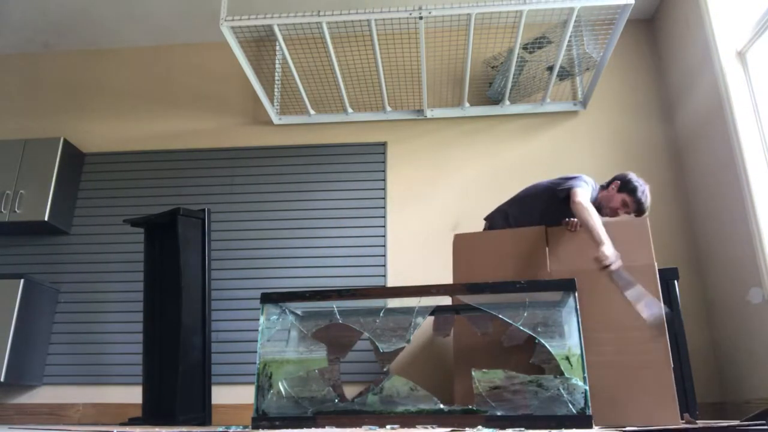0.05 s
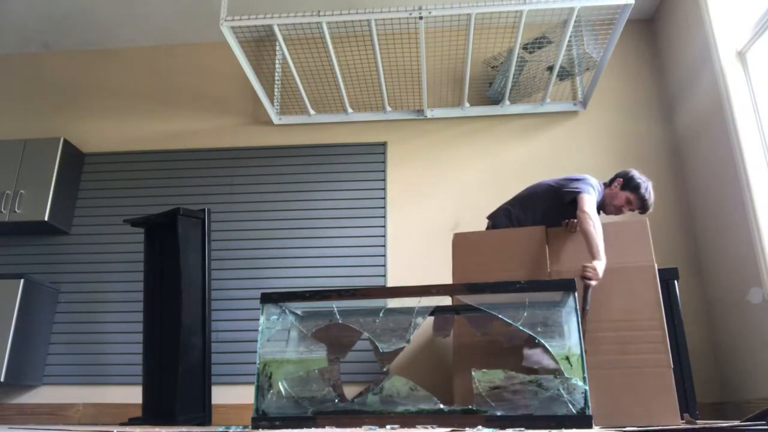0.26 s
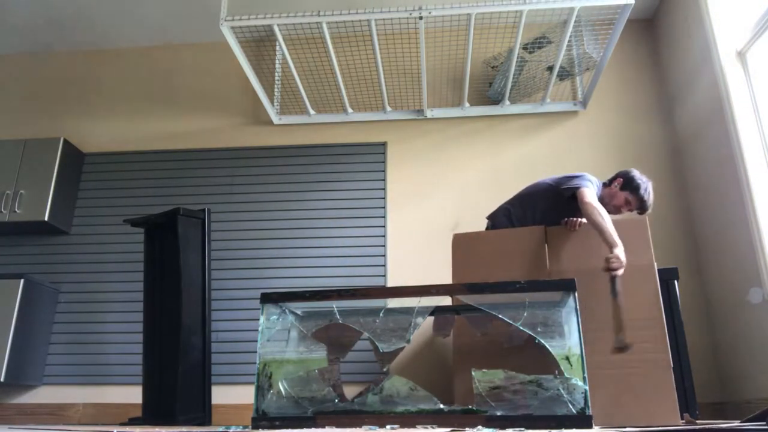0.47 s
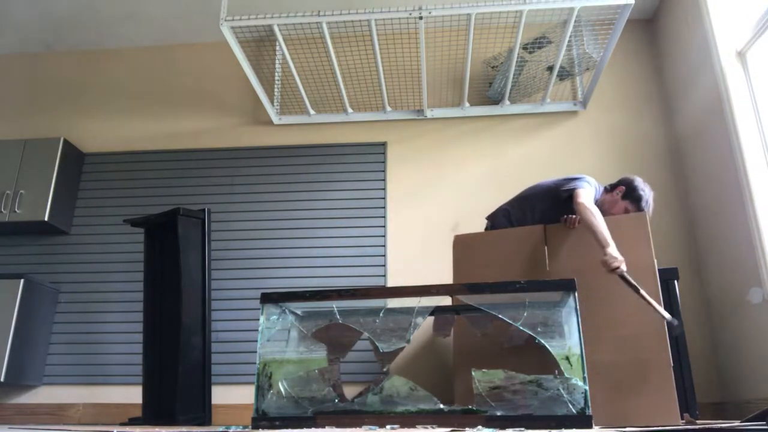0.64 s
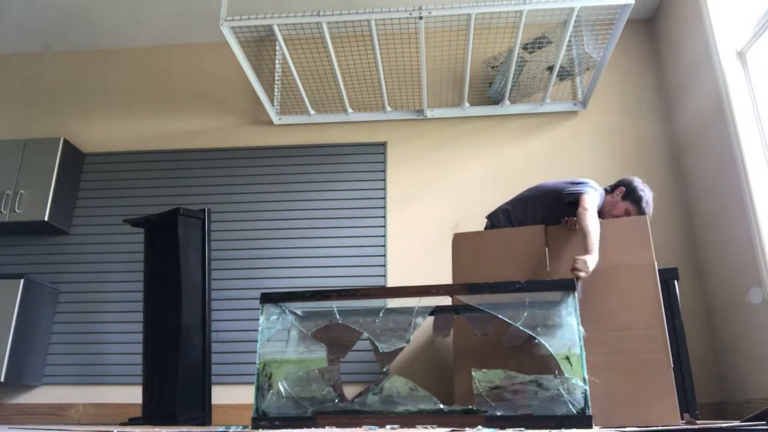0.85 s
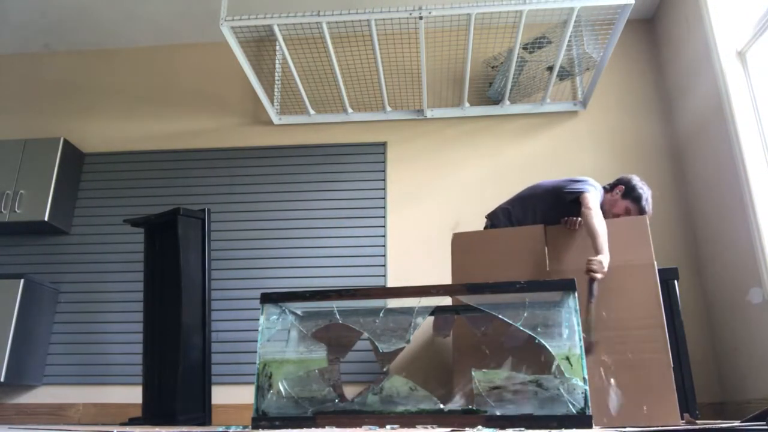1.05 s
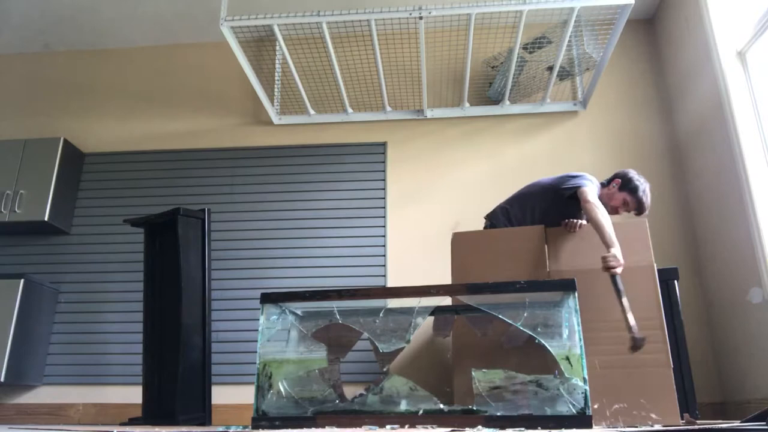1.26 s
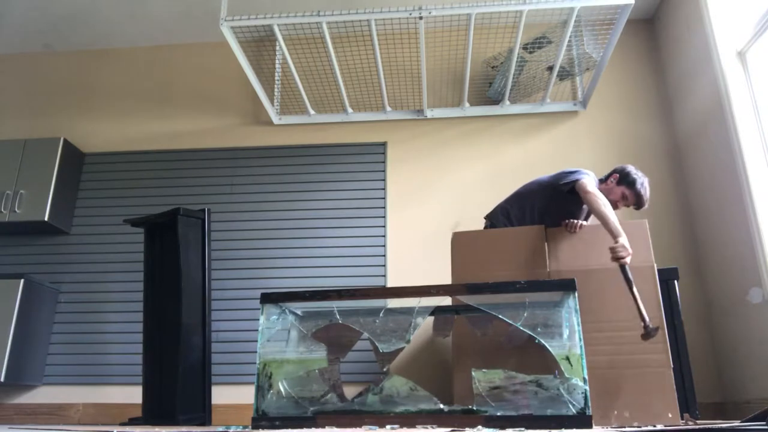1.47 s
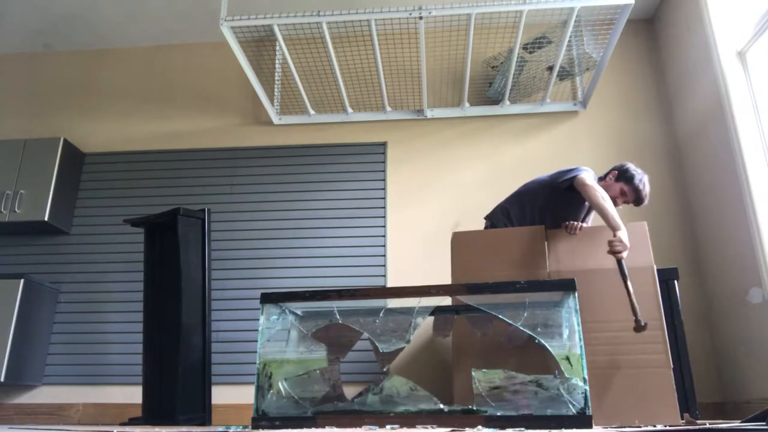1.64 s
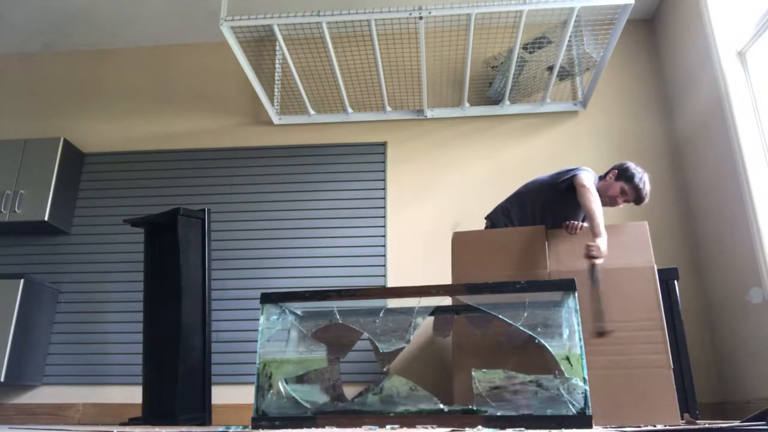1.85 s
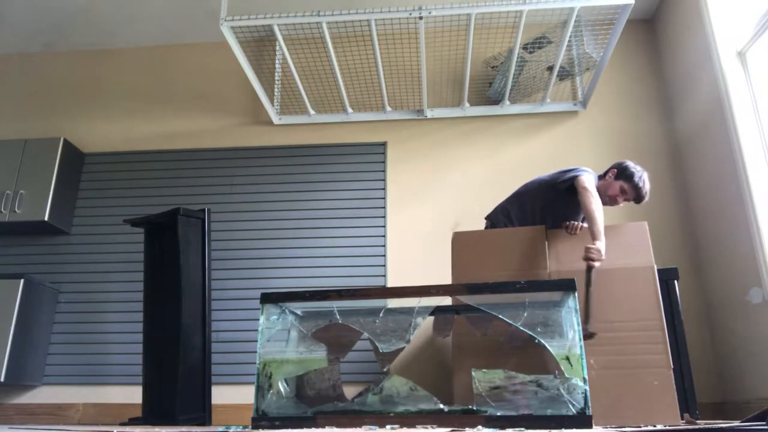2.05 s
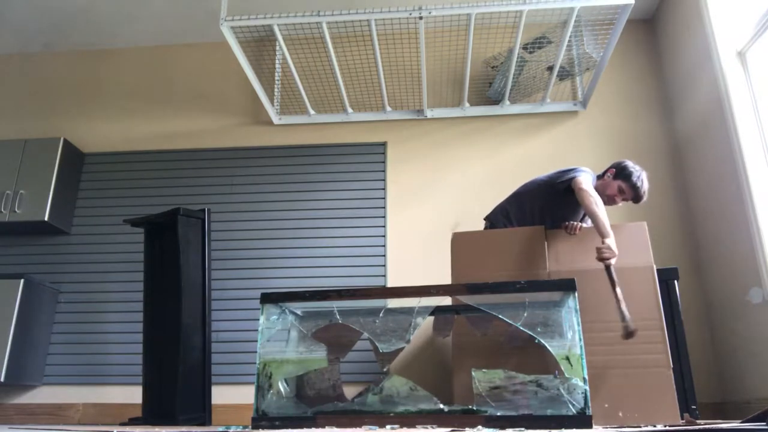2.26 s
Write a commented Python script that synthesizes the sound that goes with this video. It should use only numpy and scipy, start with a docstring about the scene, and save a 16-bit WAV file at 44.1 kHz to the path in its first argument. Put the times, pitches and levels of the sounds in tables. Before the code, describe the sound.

A glass tank shatters under three hammer blows in a bare, echoing room. The first two bring down heavy pieces, thuds and tinkling splinters; the last is lighter, with a ringing shard. The microphone is close.

```python
"""Hammer smashing a glass tank

Three blows in a bare, very live room. Each thumps the pane and bursts into cracks.
Slabs drop and the bench thuds, splinters shower down, a few large shards ring as they land.
A nearby microphone overloads on the first peaks."""
import sys
import numpy as np
from scipy import signal
from scipy.fft import rfft, irfft, next_fast_len
from scipy.io import wavfile
from scipy.ndimage import map_coordinates

SR = 44100
rng = np.random.default_rng(int(sys.argv[2]) if len(sys.argv) > 2 else 0)


def unload_audio(sound):
    """Save the sound as a 16-bit wav file, at the path given as the first command line argument."""
    columns = np.transpose(np.atleast_2d(sound))
    # keep every value between -1 and 1, then stretch to whole-number steps
    steps = np.round(np.clip(columns, -1, 1) * 32767)
    wavfile.write(sys.argv[1], SR, steps.astype(np.int16))


N = 105840
TOP_HZ = 15950  # microphone band limit

# hammer blows (time [s], crash [dB], bass [dB], treble [dB], crack decay [s], pane thump [dB])
HAMMER_BLOWS = [(0.2167, -10, 1.5, 3.5, 0.037, -22.5), (0.9059, -12.5, -1, 6, 0.0069, -23.5),
                (1.986, -21, -3, 12, 0.0056, -24.5)]


def hammer():
    """Each blow thumps the pane and cracks it; the loosened pane knocks again."""
    # pane rebounding on hammer and frame (time [s], level [dB])
    rebounds = [(.2235, -23), (.23, -21.5), (.262, -26), (.912, -28), (.922, -23.5), (1.0195, -27.5),
                (1.034, -35), (1.054, -32.5)]
    out = np.zeros(N)
    for time_s, db, bass_db, treble_db, decay_s, thump_db in HAMMER_BLOWS:
        add(out, time_s, crash(db, bass_db, treble_db, decay_s) + thump(thump_db))
    for time_s, db in rebounds:
        add(out, time_s, thump(db))
    return out


def crash(db, bass_db, treble_db, decay_s):
    """One hard contact and a dying run of cracks, coloured by the tank."""
    # breaking pane spectrum (frequency [Hz], gain [dB])
    spectrum = [(30, -39), (70, -18), (120, -10), (240, 4), (420, 1.5), (800, -4), (1400, 1.5),
                (2000, -3.5), (2700, -2), (3400, -10), (3900, -5), (4600, -14), (7000, -17.5),
                (10000, -31.5), (16000, -34)]
    contact_s, contact_over_cracks_db = 0.0022, 4
    bass_hz, treble_hz = 380, 3700

    def colour_db(hz):
        bass_shelf = bass_db / (1 + (hz / bass_hz) ** 2)
        treble_shelf = treble_db * hz ** 2 / (hz ** 2 + treble_hz ** 2)
        return along(spectrum, hz) + bass_shelf + treble_shelf

    t = np.arange(SR // 3) / SR
    contact = rng.standard_normal(len(t)) * np.exp(-t / contact_s)
    cracks = rng.standard_normal(len(t)) * (rng.random(len(t)) < 1 / 20) * np.exp(-t / decay_s)
    burst = sized(contact, contact_over_cracks_db) + sized(cracks, 0)
    return room(sized(coloured(burst, colour_db), db))


def thump(db):
    """The struck pane's damped modes give a short, woody knock."""
    # pane modes (frequency [Hz], level [dB], t60 [s])
    modes = [(610, -5.5, 0.038), (684, 2, 0.016), (850, 0.5, 0.029), (1022, 3, 0.0092)]
    # transfer from hammer head to pane (frequency [Hz], gain [dB])
    transfer = [(30, -18), (250, -20.5), (600, -0.5), (1100, -5), (3000, 1), (16000, -28)]
    t = np.arange(SR // 4) / SR
    ring = sum(amp(mode_db - 60 * t / t60_s) * np.sin(2 * np.pi * hz * t) for hz, mode_db, t60_s in modes)
    knock = coloured(ring, lambda hz: along(transfer, hz))
    return room(sized(knock, db), direct_db=-2)


def slabs():
    """Heavy pieces knock on the frame and the bench."""
    # slab impacts (time [s], level [dB], bass [dB], treble [dB], clatter decay [s])
    knocks = [(.128, -69, 1, -2, .02), (.195, -47, -9, -8, 0.016), (.285, -19.5, 7.5, 3, 0.017),
              (.5, -22, 10.5, 1.5, 0.033), (.58, -29.5, -8, -1, 0.066), (.665, -31.5, -14, 0, 0.025),
              (.921, -18, -8, -1, 0.0041), (0.966, -27.5, -37, -15, 0.042), (1.02, -34.5, 13, -38, 0.012),
              (1.125, -22, -1.5, 15, 0.035), (1.2, -21, -3, -5.5, 0.026), (1.28, -24.5, 9, -4, .04),
              (1.47, -27.5, 5, -7.5, 0.02), (1.6, -32.5, 2.5, -10, 0.027), (2.039, -30, 7.5, -6, 0.023)]
    out = np.zeros(N)
    for time_s, db, bass_db, treble_db, decay_s in knocks:
        add(out, time_s, crash(db, bass_db, treble_db, decay_s))
    return out


def thuds():
    """The bench booms briefly under the tank and falling pieces."""
    # loads on the bench (time [s], level [dB], centre [Hz])
    loads = [(.219, -16.5, 229), (.228, -28.5, 93), (0.498, -39, 101), (.575, -37, 72), (.66, -40.5, 150),
             (.909, -31, 224), (0.911, -40, 80), (1.118, -28.5, 200), (1.195, -42, 107),
             (1.271, -43.5, 130), (1.46, -50, 290), (2.029, -43.5, 111), (2.076, -43, 101)]
    skirt_db = 18.5  # loss one octave off centre
    out, push = np.zeros(N), signal.unit_impulse(SR // 3)
    for time_s, db, centre_hz in loads:
        boom = coloured(push, lambda hz: -skirt_db * np.log2(1 + np.log2((hz + 1) / centre_hz) ** 2))
        add(out, time_s, room(sized(boom, db), direct_db=-11))
    return out


def splinters(count=200):
    """Each shower is a cloud of tiny, quickly damped pings that swells and thins out."""
    # splinter showers (time [s], length [s], level [dB], centre [Hz])
    showers = [(0.221, 0.029, -19, 5750), (0.229, .02, -29.5, 11040), (0.444, 0.022, -39, 6950),
               (0.566, 0.015, -56, 7850), (0.901, .025, -24.5, 2864), (0.904, .04, -24.5, 6950),
               (.955, 0.037, -29.5, 2680), (1.098, 0.064, -24, 5920), (1.191, 0.053, -27, 5000),
               (1.232, .07, -23.5, 6490), (1.267, .03, -36.5, 11050), (1.448, 0.041, -32, 5860),
               (1.611, 0.064, -37, 5840), (1.995, 0.051, -25.5, 4970), (2.34, 0.077, -54, 12000)]
    log_spread, scatter_db, t60_s = 0.38, 4, 0.024
    rolloff_hz = 12700  # the tiniest splinters ring higher and weaker
    out, t = np.zeros(N), np.arange(SR // 32) / SR
    for time_s, length_s, db, centre_hz in showers:
        hz = centre_hz * np.exp(log_spread * rng.standard_normal((count, 1)))
        size_db = scatter_db * rng.standard_normal((count, 1))
        rolloff = (hz < TOP_HZ) / (1 + (hz / rolloff_hz) ** 4)
        pings = rolloff * amp(size_db - 60 * t / t60_s) * np.sin(2 * np.pi * hz * t)
        cloud = np.zeros(N)
        for delay_s, ping in zip(length_s * rng.rayleigh(0.5, count), pings):
            add(cloud, delay_s, ping)
        add(out, time_s, room(sized(cloud, db)))
    return out


def shards():
    """A large shard clinks, then its modes hang in the room and beat with their own echoes."""
    # modes by shard name; "chip" is the long shard landing a second time, with fewer modes (frequency [Hz],
    # level [dB], t60 with room [s])
    modes = { "long": [(3720, -8, 1.2), (3924, -1, 2.1), (5378, -2, 1.7), (7014, -6, 1), (7250, -14, 1.2),
             (9475, -14, .8), (10020, -13, .6), (11084, -16, .55), (14150, -21, .55), (15400, -17, .4)],
             "chip": [(3930, 3.5, 0.75), (9400, -20, .7), (12000, -23, 0.65)], "narrow": [(4371, -6, .9),
             (4511, 1, 1), (5006, -9, .8), (5798, -3, .8), (6121, -9, .8), (8581, -7, .55), (9577, -9, .55),
             (10900, -14, .5), (14800, -16, .4)], "broad": [(4037, 0, 1.3), (6089, -9, .7), (6745, -11, .9),
             (7144, -9, .9), (7843, -8, .7), (9803, -9, .4), (12330, -9, .55), (12750, -12, .45),
             (14000, -14, .45)], "thin": [(4592, -12, 1), (6400, 8, 1), (5850, 9, 0.99), (6880, 6, 1),
             (9168, -11, 0.64), (10440, -21, 0.37), (12800, 0, .45), (14050, -6, 0.53), (15100, -3, 0.37)],
             "small": [(5190, 0, 1.1), (6901, -8, .9), (7881, -7, .8), (9308, -12, .9), (12400, -13, .65)],
             "thick": [(3252, -10, 1.3), (3747, 0, 1.9), (4048, 3, .9), (5620, -10, .8), (5959, -2, .7),
             (6150, -3, .4), (6788, -9, .8), (8290, -6, .7), (9426, -15, .8), (11970, -17, .45),
             (12760, -16, .5)], }
    # shard landings (time [s], level [dB], rise [s], shard name)
    landings = [(.222, -37, 0.0061, "long"), (.455, -24.5, 0.018, "long"), (.585, -30, 0.018, "chip"),
                (1.102, -25.5, 0.014, "narrow"), (1.255, -27.5, 0.028, "broad"),
                (1.448, -40, 0.016, "thin"), (1.625, -38.5, 0.013, "small"), (2.015, -26, 0.0049, "thick")]
    clink_db, clink_t60_s = 8, 0.08

    def beat():
        return 0.79 * wobble(rate_hz=46.8) + 0.35 * wobble(rate_hz=130)  # flutter + shimmer

    out, t = np.zeros(N), np.arange(N) / SR
    clink = amp(clink_db - 60 * t / clink_t60_s)
    for time_s, db, rise_s, shard in landings:
        ring = np.zeros(N)
        for hz, mode_db, t60_s in modes[shard]:
            sine, cosine = np.sin(2 * np.pi * hz * t), np.cos(2 * np.pi * hz * t)
            echoes = (0.5 + beat()) * cosine + beat() * sine
            ring += amp(mode_db) * (clink * sine + amp(-60 * t / t60_s) * echoes)
        add(out, time_s, amp(db) * (1 - np.exp(-t / rise_s)) * ring)
    return out


def air():
    """Room tone, and a soft rush of the swing that peaks at the first blow."""
    # room tone spectrum (frequency [Hz], gain [dB])
    spectrum = [(25, -22), (100, 9.5), (250, 4), (700, -0.5), (2000, -12), (6000, -18.5), (16000, -32)]
    tone_db, swing_db, swing_s = -65, -64, 0.075
    noise = coloured(rng.standard_normal(N), lambda hz: along(spectrum, hz))
    from_blow_s = np.abs(np.arange(N) / SR - HAMMER_BLOWS[0][0])
    swing = amp(swing_db) * np.exp(-from_blow_s / swing_s)
    return noise / np.std(noise) * (amp(tone_db) + swing)


def room(x, direct_db=-13):
    """Direct sound, early echoes and a tail longest in the mids; drawn anew for each impact."""
    # reverberation (frequency [Hz], t60 [s])
    decay = [(60, 0.43), (200, 0.76), (500, 1.44), (1300, 1.684), (2700, 1.33), (4500, 1.06), (7500, 0.66),
             (11000, 0.54), (16000, 0.44)]
    early_db, early_decay_s = -13.5, 0.009
    hz, t, bands = signal.stft(rng.standard_normal(N), SR, nperseg=256)
    bands = bands * amp(-60 * t / along(decay, hz)[:, None])
    tail = signal.istft(bands, SR, nperseg=256)[1][:N]
    early = rng.standard_normal(N) ** 3 * np.exp(-np.arange(N) / SR / early_decay_s)
    response = tail / np.sqrt(SR / 10) + amp(early_db) * early / np.linalg.norm(early)
    response[0] += amp(direct_db)
    return signal.fftconvolve(x, response)[:N]


def amp(db):
    """Decibels to gain."""
    return 10 ** (np.asarray(db) / 20)


def along(points, hz):
    """Interpolate (frequency [Hz], value) points on a log axis."""
    knots_hz, values = np.transpose(points)
    return np.interp(np.log(hz + 1), np.log(knots_hz + 1), values)


def sized(x, db):
    """Scale a burst to the energy of 0.1 s at this level."""
    return amp(db) * x * np.sqrt(SR / 10) / np.linalg.norm(x)


def add(out, time_s, x):
    """Mix x into out from time_s."""
    start = round(time_s * SR)
    out[start:start + len(x)] += x[:N - start]


def wobble(rate_hz):
    """Piecewise-linear random curve, rate_hz knots a second."""
    return np.interp(np.arange(N) * rate_hz / SR, np.arange(512), rng.standard_normal(512))


def coloured(x, db_of_hz):
    """Minimum-phase filter with the given gain curve."""
    size = 2 * next_fast_len(len(x))
    gain = amp(db_of_hz(np.fft.rfftfreq(size, 1 / SR)))
    cepstrum = irfft(np.log(gain + 1e-6), size)
    cepstrum[1:size // 2] *= 2
    cepstrum[size // 2 + 1:] = 0
    return irfft(rfft(x, size) * np.exp(rfft(cepstrum)), size)[:len(x)]


def scene():
    """All sources at one microphone."""
    return (hammer() + slabs() + thuds() + splinters() + shards() + air())[None]


def record(dry):
    """The microphone rounds off the highest peaks and cuts above its band limit."""
    hardness, edge_hz = 5, 400
    clipped = dry / (1 + np.abs(dry) ** hardness) ** (1 / hardness)
    size = next_fast_len(N + SR // 2)
    lowpass = np.clip((TOP_HZ - np.fft.rfftfreq(size, 1 / SR)) / edge_hz + 0.5, 0, 1)
    return irfft(rfft(clipped, size) * lowpass, size)[..., :N]


dry = scene()
out = record(dry)
unload_audio(out)
```